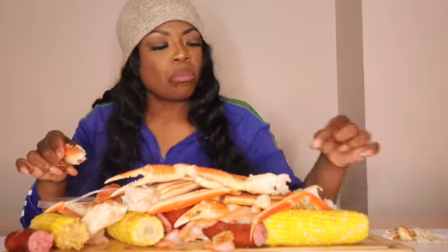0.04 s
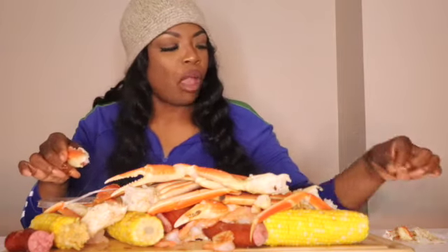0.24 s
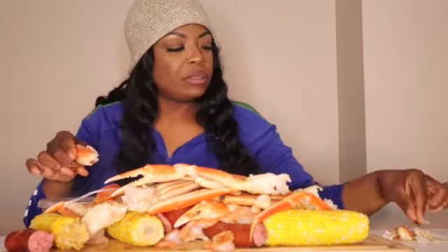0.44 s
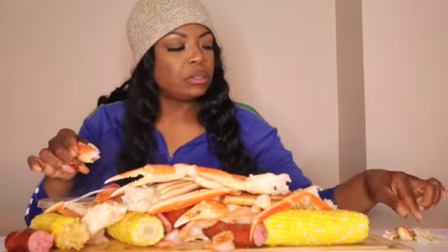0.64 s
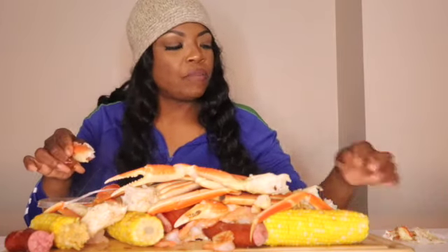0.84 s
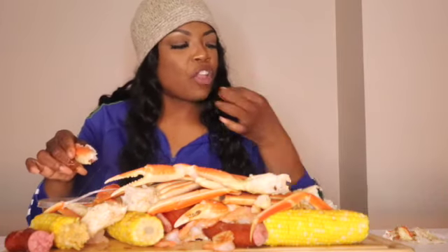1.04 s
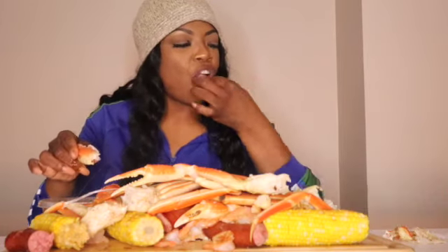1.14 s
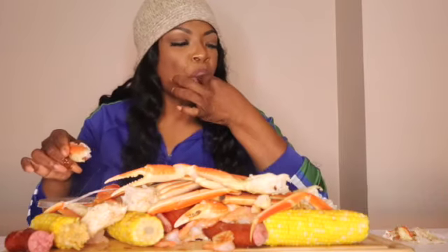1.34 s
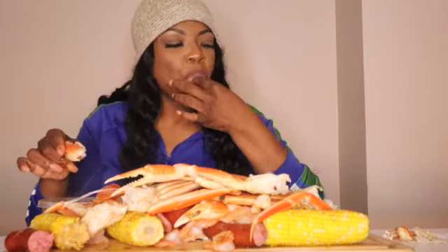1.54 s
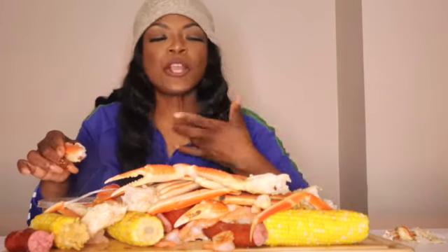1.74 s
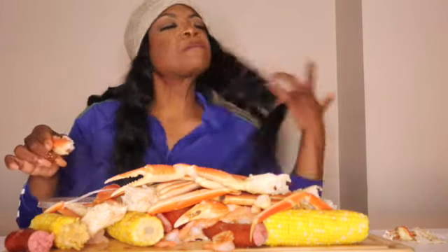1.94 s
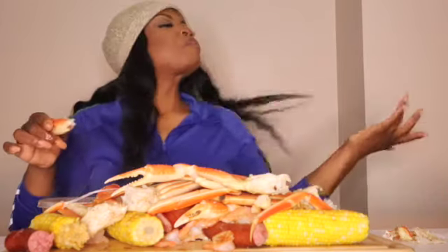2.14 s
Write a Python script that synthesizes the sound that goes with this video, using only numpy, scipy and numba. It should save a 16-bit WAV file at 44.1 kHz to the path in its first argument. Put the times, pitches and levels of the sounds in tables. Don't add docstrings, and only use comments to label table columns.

```python
import sys
import numpy as np
from scipy import signal
from scipy.io import wavfile
from scipy.ndimage import uniform_filter1d
from numba import njit

SR = 44100
rng = np.random.default_rng(int(sys.argv[2]) if len(sys.argv) > 2 else 0)


def makeup_ratio(level_db):
    decades = np.asarray(level_db, float) / 20
    return 10 ** decades


def persist_wave(psi):
    counts = np.round(np.clip(psi, -1, 1) * 32767).astype(np.int16)
    wavfile.write(sys.argv[1], SR, np.atleast_2d(counts).T)


N = 97020


def unit(x):
    return x / np.sqrt(np.mean(x ** 2))


@njit
def moving_band(x, hz, width):
    out = np.empty(len(x))
    band_state, low_state = 0., 0.
    for i in range(len(x)):
        g = np.tan(np.pi * hz[i] / SR)
        damping = width / hz[i]
        v = (band_state + g * (x[i] - low_state)) / (1 + g * (g + damping))
        band_state = 2 * v - band_state
        low_state += 2 * g * v
        out[i] = damping * v
    return out


def band(x, hz, width):
    centre = np.clip(hz + np.zeros(len(x)), 20, .45 * SR)
    return moving_band(x, centre, float(width))


def ring(at_s, hz, t60):
    t = np.clip(np.arange(N) / SR - at_s, 0, None)
    return np.sin(2 * np.pi * hz * t) * np.exp(-np.log(1000) * t / t60)


def grains(per_s, scatter_db):
    hit, size, sign = rng.random((3, N))
    loudness = makeup_ratio(-scatter_db * np.log(size + 1e-9))
    return (hit < per_s / SR) * loudness * np.sign(sign - .5)


def walk(rate):
    k = int(SR / rate)
    stairs = np.repeat(rng.standard_normal(N // k + 1), k)
    return unit(uniform_filter1d(uniform_filter1d(stairs, k), k)[:N])


def stereo(hz, width, mono_hz):
    mid = unit(band(rng.standard_normal(N), hz, width))
    side = unit(band(rng.standard_normal(N), hz, width))
    share = 0.81 * hz ** 2 / (hz ** 2 + mono_hz ** 2)
    return np.sqrt(1 - share) * mid + np.sqrt(share) * side * np.array([[1], [-1]])


def hum():
    # f/Hz, level/dB per Hz
    hum_levels = [(15, -29), (25, 13), (231, 5.5), (363, 3), (427, 5), (2780, -11), (3010, -3), (9770, -55),
                  (15000, -100)]
    f, db = np.array(hum_levels).T
    tone = 0
    for hz in 30 * 2 ** np.arange(0, 9.1, .5):
        level_db = np.interp(np.log(hz), np.log(f), db) + 0.4 * walk(5.64)
        tone = tone + makeup_ratio(level_db) * np.sqrt(hz) * stereo(hz, hz / 3, mono_hz=170)
    whine_hz = 416.4 * (1 + 0.0052 * walk(4.74))
    whine = np.sin(2 * np.pi * np.cumsum(whine_hz) / SR)
    return unit(tone) * makeup_ratio(-48) + makeup_ratio(-61) * whine


def snap():
    # f/Hz, level/dB, t60/s
    smack_modes = [(1388, -10.5, 0.048), (1705, 1, 0.0049), (2020, -1, 0.0059), (2425, -3, 0.009),
                   (2873, 8, 0.0099), (3060, -13, 0.02), (5000, -10.5, 0.0058), (7200, -16.5, 0.0067),
                   (9030, -10, 0.0071)]
    # f/Hz, level/dB, t60/s
    thud_modes = [(253, -43.5, 0.01), (367, 2.5, 0.031), (530, 8.5, 0.012)]
    snap_s, longest_s, crack_s = .23608, .016, .0004
    t = np.arange(N) / SR - snap_s
    crack = rng.standard_normal(N) * np.exp(-np.abs(t) / crack_s)
    crack = band(band(crack, 8300, 5000), 8300, 6000)
    body = sum(makeup_ratio(db) * ring(snap_s, hz, min(t60, longest_s)) for hz, db, t60 in smack_modes)
    body = signal.sosfilt(signal.butter(N=8, Wn=1156, btype="high", fs=SR, output="sos"), body)
    thud = sum(makeup_ratio(db) * ring(snap_s, hz, t60) for hz, db, t60 in thud_modes)
    return makeup_ratio(-2) / 2 * (body + makeup_ratio(-21) * thud + makeup_ratio(-10) * crack)


def room():
    # delay t/s, left level/dB, right level/dB
    echo_paths = [(.0047, -5, -3), (.0070, -3, -9), (.0084, -3, -8), (.0112, -9, -11), (.0128, -10, -10)]
    # f/Hz, t60/s
    fade_times = [(125, 0.23), (500, 0.39), (1500, 0.92), (3000, 0.63), (6000, 0.64), (9000, 0.15),
                  (14000, 0.22)]
    wall_dull_hz, build_s = 4000, .009
    t = np.arange(N) / SR
    f, t60 = np.array(fade_times).T
    tail = 0
    for hz in 125 * 2 ** np.arange(0, 7, .5):
        dull_db = -7 * max(np.log2(hz / wall_dull_hz), 0)
        fade_db = -60 * t / np.interp(np.log(hz), np.log(f), t60)
        tail = tail + stereo(hz, hz / 2, mono_hz=920) * np.sqrt(hz / 3000) * makeup_ratio(dull_db + fade_db)
    echoes = 0
    for delay_s, left_db, right_db in echo_paths:
        echoes = echoes + makeup_ratio([[left_db], [right_db]]) * (np.arange(N) == int(delay_s * SR))
    echoes = signal.lfilter(*signal.butter(N=2, Wn=wall_dull_hz, fs=SR), echoes)
    return echoes + makeup_ratio(-40) * tail * (1 - np.exp(-(t / build_s) ** 2))


def rustle():
    # start t/s, length t/s, level/dB, centre f/Hz
    strokes = [(0.546, 0.03, -64, 4960), (0.672, 0.023, -67.5, 5000), (0.779, .08, -68, 6860),
               (0.915, 0.014, -51.5, 3700), (1.108, 0.045, -44.5, 8000), (1.12, 0.088, -50, 2120),
               (1.215, 0.044, -56, 5000), (1.393, 0.18, -53.5, 10900), (1.428, 0.12, -50, 7560),
               (1.63, 0.27, -58, 8500), (1.89, 0.21, -65, 7500), (1.971, 0.052, -57.5, 10200),
               (1.978, 0.27, -58.5, 2310)]
    t = np.arange(N) / SR
    fibres = grains(per_s=9600, scatter_db=3.5)
    out = 0
    for start_s, length_s, db, hz in strokes:
        swell = np.sin(np.pi * np.clip((t - start_s) / length_s, 0, 1) ** .4)
        out = out + makeup_ratio(db) * swell * unit(band(fibres, hz, 1.19 * hz))
    return out


def ticks():
    # t/s, peak level/dB, ring f/Hz
    bursts = [(0.6839, -45.2, 1720.0), (0.7722, -51.4, 3550.0), (0.8343, -53.0, 9820.0),
              (0.9114, -42.3, 2580.0), (0.9172, -39.5, 2330.0), (0.9801, -47.7, 5680.0),
              (1.0519, -51.8, 5680.0), (1.0743, -35.4, 9450.0), (1.0836, -33.1, 8230.0),
              (1.0882, -43.9, 8480.0), (1.1012, -32.1, 8290.0), (1.1035, -28.8, 8050.0),
              (1.1104, -32.4, 5120.0), (1.1115, -28.8, 4970.0), (1.1322, -33.6, 1530.0),
              (1.2265, -34.7, 2820.0), (1.2317, -41.3, 2710.0), (1.439, -34.2, 6930.0),
              (1.7771, -36.9, 3750.0), (1.7921, -34.7, 4260.0), (1.8981, -45.8, 3980.0),
              (1.9802, -34.7, 2760.0), (1.9851, -35.1, 5100.0)]
    rise_s = .0003
    t, out = np.arange(N) / SR, 0
    for start_s, db, hz in bursts:
        t60 = min(20 / hz, .007)
        opening = np.clip((t - start_s) / rise_s, 0, 1) ** 2
        body = makeup_ratio(60 * rise_s / t60) * ring(start_s, hz, t60) * opening
        edge = makeup_ratio(-3) * ring(start_s + rise_s, 7500, .0005)
        out = out + makeup_ratio(db) * (body + edge)
    return out


def suck():
    # t/s, level/dB, lip slit f/Hz, mouth opening level/dB
    course = [
        (1.495, -62, 1700, -22),
        (1.510, -46, 1700, -22),
        (1.543, -42, 1900, -22),
        (1.549, -31, 2700, -26),
        (1.572, -37, 3400, -12),
        (1.594, -41, 3600, -12),
        (1.599, -35, 4300, -18),
        (1.618, -41, 5800, -18),
        (1.635, -58, 6000, -20),
    ]
    # f/Hz, width f/Hz, level/dB
    cavities = [(1750, 600, -14), (2750, 300, 0), (3550, 350, -3), (5600, 900, -9), (9000, 6000, -9)]
    t = np.arange(N) / SR
    s, *columns = np.array(course).T
    db, slit_hz, open_db = (np.interp(t, s, column) for column in columns)
    gurgle = makeup_ratio(2 * walk(150))
    air = unit(grains(per_s=7000, scatter_db=2)) * gurgle
    mouth = 0
    for k, (hz, width, level_db) in enumerate(cavities):
        mouth = mouth + (-1) ** k * makeup_ratio(level_db) * unit(band(air, hz, width))
    mouth = mouth + makeup_ratio(-3) * unit(band(air, slit_hz, 750))
    opening = band(band(air, 750, 220), 750, 440)
    mouth = mouth + makeup_ratio(open_db) * unit(opening)
    inside = np.interp(t, [s[0] - .01, s[0], s[-1], s[-1] + .01], [0, 1, 1, 0])
    return mouth * makeup_ratio(db + 3) * inside


def scene():
    spread = snap() + rustle()
    wet = ticks() + suck()
    walls = signal.fftconvolve((spread + makeup_ratio(-5.5) * wet)[None], room(), axes=1)[:, :N]
    direct = spread + wet
    both = np.array([np.roll(direct, 1), direct])
    return (both + walls + hum()) * makeup_ratio([[-0.6], [0.6]])


def band_limit(x):
    return signal.sosfilt(signal.butter(12, 15900, fs=SR, output="sos"), x)


def record(dry):
    return band_limit(np.clip(dry, -1, 1))


dry = scene()
out = record(dry)
persist_wave(out)
```